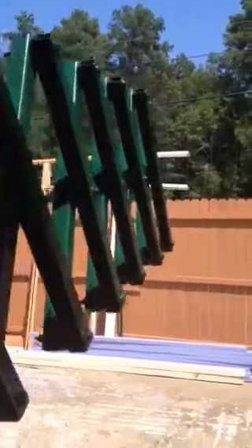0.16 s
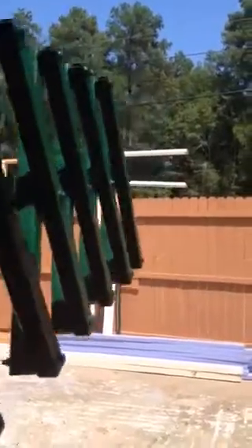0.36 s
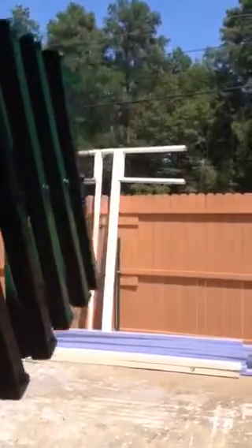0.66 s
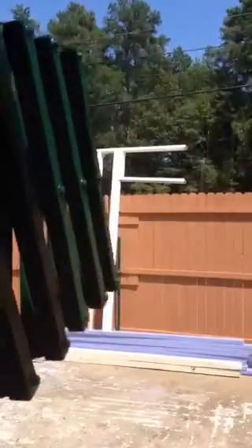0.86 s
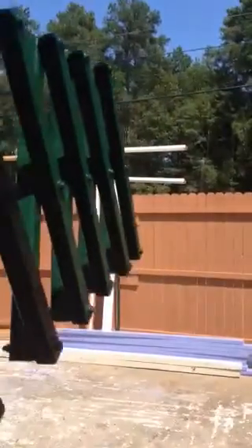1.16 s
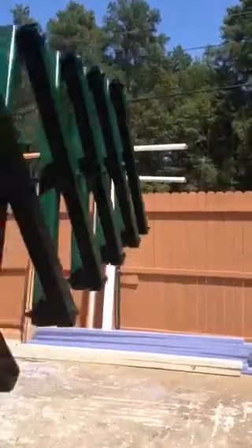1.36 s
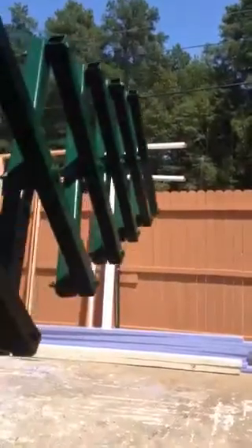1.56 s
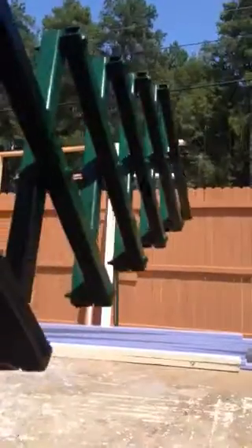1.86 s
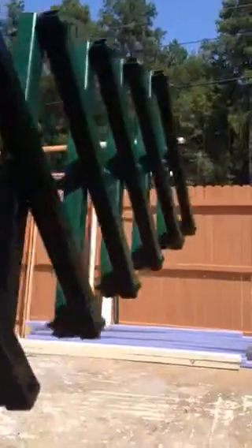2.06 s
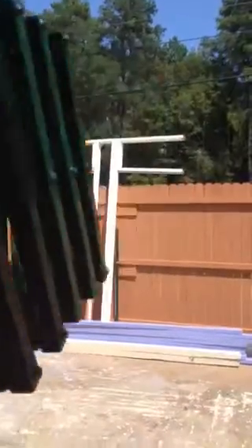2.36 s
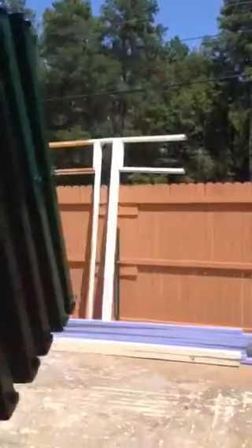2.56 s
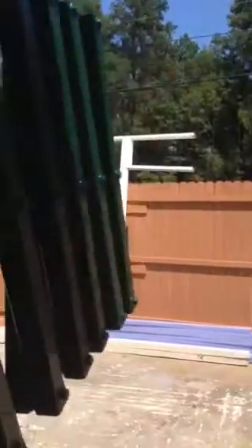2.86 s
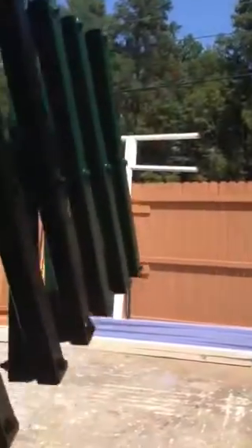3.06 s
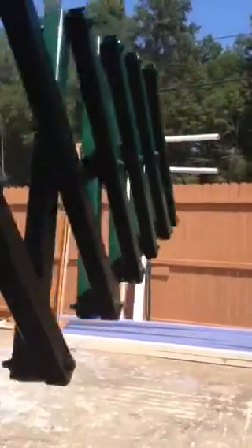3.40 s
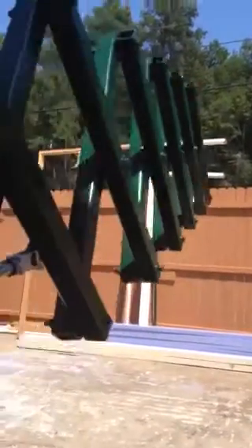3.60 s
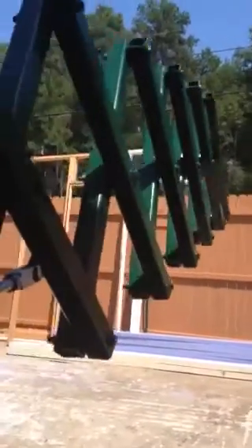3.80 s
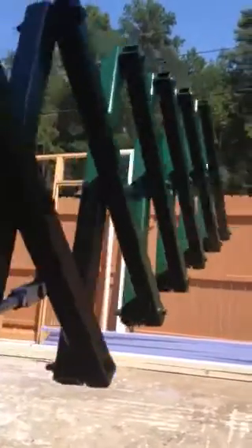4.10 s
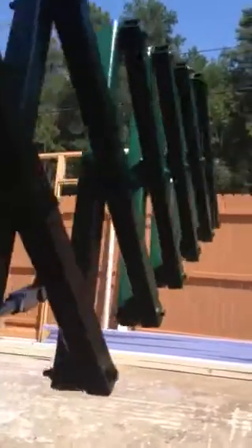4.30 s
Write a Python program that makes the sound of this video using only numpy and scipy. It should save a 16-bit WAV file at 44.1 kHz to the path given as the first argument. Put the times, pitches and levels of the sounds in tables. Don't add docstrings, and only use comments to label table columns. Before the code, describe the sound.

Three bursts of compressed air hiss and bleed away outdoors while a steel tube arm clinks, snaps and finally clatters hard.

```python
import sys
import numpy as np
from scipy import signal
from scipy.fft import rfft, irfft, next_fast_len
from scipy.io import wavfile
from scipy.ndimage import uniform_filter1d

SR = 44100
rng = np.random.default_rng(int(sys.argv[2]) if len(sys.argv) > 2 else 0)


def digitize_waveform(pressure):
    field = np.atleast_2d(pressure).T
    bounded = np.clip(field, -1, 1)
    quanta = np.round(bounded * 32767).astype(np.int16)
    wavfile.write(sys.argv[1], SR, quanta)


def voltage_ratio(level):
    return 10 ** (np.asarray(level, float) / 20)


N = 195754
TIME = np.arange(N) / SR

# pitch in Hz, level in dB, t60 in seconds.
TUBE_MODES = [(565, -6, .2), (667, -1, .25), (752, -4, .2), (836, -3, .2), (892, -4, .2), (981, -5, .2),
              (1097, -6, .2), (1318, -3, .2), (1380, -3, .2), (1497, 0, .2), (1695, -4, .2), (1935, -4, .2),
              (2100, -5, .2), (2257, -4, .2), (2312, -1, .25), (2650, -4, .2), (2736, -4, .2),
              (2929, -2, .25), (3356, -4, .17), (3547, -3, .2), (3760, -6, .13), (4025, -5, .14),
              (4510, -6, .11), (4750, -6, .1), (5050, -7, .1), (5600, -10, .09), (6400, -11, .08),
              (7312, -12, .1), (8200, -14, .07), (9700, -15, .06)]


def level(x, db):
    return x * voltage_ratio(db) / np.sqrt(np.mean(x ** 2))


def band(x, hz, width):
    return signal.lfilter(*signal.iirpeak(hz, hz / width, fs=SR), x)


def walk(rate):
    hold = int(SR / rate)
    steps = np.repeat(rng.standard_normal(N // hold + 1), hold)
    return 1.1 * uniform_filter1d(uniform_filter1d(steps, hold), hold)[:N]


def flicker_noise(table, flicker_db, rate):
    size = 2 * next_fast_len(N // 2 + 1)
    hz = np.maximum(np.fft.rfftfreq(size, 1 / SR), 1)
    f, db = np.transpose(table)
    spectrum = rfft(rng.standard_normal(size)) * voltage_ratio(np.interp(np.log(hz), np.log(f), db))
    place = 2 * np.log2(hz)
    bands = []
    for k in range(8, 30):
        piece = irfft(spectrum * np.clip(1 - abs(place - k), 0, 1))[:N]
        bands.append(voltage_ratio(flicker_db * walk(rate)) * piece)
    return bands


def add(out, s, piece):
    i = int(s * SR)
    out[i:i + len(piece)] += piece[:N - i]


def jet():
    # valve opens in seconds, shuts in seconds, jet level in dB,
    # first rush in dB, low turbulence over the jet in dB.
    bursts = [
        (-0.3, 0.526, -31, 9, 1),
        (1.466, 2.3, -33.5, 4, 5),
        (3.926, 4.8, -32, 4, 4.5),
    ]
    # frequency in Hz, density in dB per Hz.
    jet_spectrum = [(710, -37), (1200, -22), (1970, -17), (2240, -21), (2740, -15.5), (3360, -14.5),
                    (5630, -8), (6200, -7), (6750, -4), (8020, -2), (9620, -4.5), (13700, 1), (15600, -4)]
    # pitch in Hz, width in Hz, level in dB.
    port_modes = [(6157, 320, 5), (6300, 53, 10.5), (7800, 83, 2), (12130, 430, 3.5), (2660, 56, -5),
                  (4350, 270, -14)]
    open_s, surge_s, climb_db_per_s2 = 0.014, 0.14, 4
    shut_db, shut_s, bleed_db_per_s, empty_db_per_s2 = -6.5, 0.022, 14, 218
    whistle_db, whistle_db_per_s, whistle_shut_db, bleed_low_db = 6, 1.5, -12, 0.5

    bands = flicker_noise(jet_spectrum, 0.99, 24.2)
    low, high = sum(bands[:17]), sum(bands[17:])
    scale = 1 / np.std(high)
    edge = rng.standard_normal(N)
    whistle = 0
    for f, width, db in port_modes:
        cavity = band(band(edge, f, width * 1.2), f, width * 1.2)
        whistle = whistle + voltage_ratio(db + 1.4 * walk(28.37)) * cavity
    whistle = level(whistle, -16)

    out = 0
    for opens, shuts, db, surge_db, low_db in bursts:
        blowing = np.clip(TIME, opens, shuts) - opens
        after = np.maximum(TIME - shuts, 0)
        shut = 1 - np.exp(-after / shut_s)
        flow_db = db + surge_db * np.exp(-blowing / surge_s) + climb_db_per_s2 * blowing ** 2
        flow_db = flow_db + shut_db * shut - bleed_db_per_s * after - empty_db_per_s2 * after ** 2
        hiss = scale * (high + low * voltage_ratio(low_db + bleed_low_db * shut))
        hiss = hiss + whistle * voltage_ratio(whistle_db + whistle_db_per_s * blowing + whistle_shut_db * shut)
        out = out + hiss * voltage_ratio(flow_db + 2.0) * np.sqrt(np.minimum(blowing / open_s, 1))
    return out


def thumps():
    # start in seconds, peak level in dB, body pitch in Hz, t60 in seconds.
    spool_hits = [
        (0.518, -19.5, 330, 0.023),
        (1.468, -30, 497, 0.034),
        (1.473, -30.5, 323, 0.031),
        (1.542, -20.5, 333, 0.039),
        (1.563, -15.5, 296, 0.0083),
        (1.57, -30, 420, 0.061),
        (1.676, -33, 265, 0.039),
        (2.298, -21, 334, 0.027),
    ]
    out, t = np.zeros(N), TIME[:4000]
    for s, db, hz, t60 in spool_hits:
        slap_db = -31 + 0.43 * (db + 25) - db
        body = np.sin(2 * np.pi * hz * t) + .4 * np.sin(2 * np.pi * 1.6 * hz * t)
        body = body * np.exp(-np.log(1000) * t / max(t60, .004))
        slap = band(rng.standard_normal(len(t)) * np.exp(-t / 0.0097), 1080, 1400)
        hit = voltage_ratio(slap_db) * slap / abs(slap).max() + body / abs(body).max()
        add(out, s + 0.0024, voltage_ratio(db + 0.5) * hit)
    return out


def clinks():
    # start in seconds, peak level in dB, centre in Hz, spread in octaves.
    dull_hits = [
        (0.648, -31.5, 1710, .4),
        (1.968, -29.5, 1430, 0.62),
        (2.414, -38, 790, 0.44),
        (2.469, -27, 750, 0.34),
        (3.699, -29, 1500, .29),
        (3.834, -25, 834, 0.43),
        (4.125, -20, 710, 0.57),
    ]
    mid_hits = [
        (0.6986, -43, 1620, 0.17),
        (2.4359, -39, 2150, .17),
        (2.729, -31.5, 2770, .25),
        (2.819, -40.5, 2190, .41),
        (2.977, -39, 1790, 0.17),
        (2.9841, -42, 2190, 0.74),
        (3.246, -41, 2140, .3),
        (3.7681, -24, 1980, .46),
        (4.0948, -27, 1580, 0.12),
        (4.283, -30, 2940, .31),
    ]
    bright_hits = [(0.6501, -23.5, 4000, 0.24), (1.31, -40.5, 5040, 0.66), (1.332, -40.5, 3850, .38),
                   (1.361, -41.5, 4800, .31), (1.464, -19.5, 6530, 0.24), (2.4104, -34, 4240, 0.25),
                   (2.4409, -19.5, 4700, 0.23), (2.456, -36, 4810, .18), (2.4955, -29.5, 4760, 0.28),
                   (2.5342, -28, 4720, 0.21), (2.669, -39, 4120, 0.49), (3.205, -37, 3180, 0.34),
                   (3.215, -35.5, 4640, 0.14), (3.28, -43, 4040, .29), (3.291, -42.5, 4060, .35),
                   (3.3278, -43, 3980, .32), (3.365, -46, 3960, .35), (3.6619, -15.5, 3590, 0.2),
                   (3.917, -26, 3240, 0.48)]
    heavy_hits = [
        (3.6621, -9.5, 1660, 0.46),
        (3.7765, -23, 1990, 0.87),
        (3.925, -13, 1550, 0.44),
        (3.949, -15, 3720, 0.53),
        (4.0656, -27.5, 1580, 0.26),
        (4.138, -15.5, 2670, 0.98),
        (4.179, -13, 1420, 0.87),
        (4.194, -12.5, 2490, 0.31),
        (4.2024, -21, 1450, 0.6),
    ]
    # ring t60 in seconds at 1 kHz, contact in seconds.
    contacts = [(0.17, 0.0087), (.11, 0.005), (.11, 0.0048), (0.11, 0.0046)]
    out, t = np.zeros(N), TIME[:10000]
    f, mode_db, mode_t60 = np.transpose(TUBE_MODES)[:, :, None]
    for table, (ring_s, contact) in zip((dull_hits, mid_hits, bright_hits, heavy_hits), contacts):
        for s, db, hz, spread in table:
            t60 = ring_s * (1000 / hz) ** 0.56
            chance = rng.standard_normal((3, len(f), 1))
            spread = max(spread, .04)
            fall = np.log(1000) * t / max(t60, .01)
            gain = voltage_ratio(mode_db + 2 * chance[0]) * np.exp(-.5 * (np.log2(f / hz) / spread) ** 2)
            tones = np.sin(2 * np.pi * f * (1 + 0.014 * chance[1]) * t + 9 * chance[2])
            ring = np.sum(gain * np.exp(-fall * 0.1 / mode_t60) * tones, axis=0)
            ring = ring + .5 * np.exp(-fall) * np.sin(2 * np.pi * hz * t)
            push = rng.standard_normal(len(t)) * np.exp(-t / max(contact, .0002))
            hit = signal.fftconvolve(ring, push[:3000])[:len(t)]
            width = hz * min(1.5, 1.82 * spread)
            crack = band(band(push, hz, width), hz, width)
            hit = hit / abs(hit).max() + 10.6 * spread * crack / abs(crack).max()
            add(out, s, voltage_ratio(db + 1.5) * hit / abs(hit).max())
    return out


def scuffs():
    # start in seconds, peak level in dB, centre in Hz, fall in seconds.
    slow_slips = [
        (0.654, -19, 4360, 0.013),
        (1.335, -40, 6000, .02),
        (3.127, -34, 5500, 0.035),
        (3.153, -38, 5970, 0.014),
        (3.69, -14, 300, 0.031),
        (3.709, -18, 7000, 0.042),
        (3.778, -17, 4000, 0.026),
        (4.179, -23, 5000, 0.0054),
    ]
    snap_slips = [
        (2.457, -19.5, 9000, 0.0091),
        (2.733, -30.5, 8000, 0.03),
        (3.347, -31, 7500, 0.0042),
        (3.662, -1.5, 2850, 0.0089),
        (3.927, -7.5, 4500, 0.01),
        (4.066, -9, 5600, 0.0076),
        (4.139, -10, 5960, 0.012),
    ]
    out = np.zeros(N)
    for table, rise_share, width in ((slow_slips, .55, 0.89), (snap_slips, .07, 1.28)):
        for s, db, hz, fall in table:
            rise = rise_share * fall
            t = TIME[:9000] - 3 * rise
            swell = np.where(t < 0, np.exp(-2 * (t / rise) ** 2), np.exp(-t / fall))
            puff = rng.standard_normal(len(t)) * swell
            add(out, s - 3 * rise, voltage_ratio(db - 8.0) * band(puff, hz, min(width * hz, SR / 4)))
    return out


def creaks():
    # start in seconds, length in seconds, pitch in Hz, level in dB.
    stick_slips = [(0.647, 0.011, 4030, -33.5), (0.649, 0.01, 4980, -37), (1.327, .012, 3960, -48),
                   (3.21, .015, 1564, -50.5), (3.66, 0.013, 1520, -27), (1.661, 0.05, 960, -43.5),
                   (1.963, 0.029, 2660, -37.5), (2.414, 0.02, 4270, -41), (2.424, .02, 4930, -35.5),
                   (2.734, 0.029, 3130, -47), (2.882, 0.027, 2990, -56), (2.913, 0.032, 2540, -58),
                   (1.986, 0.025, 1360, -47), (2.98, .02, 2150, -53), (3.756, 0.06, 1970, -38.5),
                   (3.781, 0.069, 4200, -44), (3.825, 0.046, 907, -43.5), (4.282, .03, 2920, -40)]
    out, t = np.zeros(N), TIME[:6000]
    for s, length, hz, db in stick_slips:
        waver = uniform_filter1d(rng.standard_normal((2, len(t))), 110) * np.sqrt(110)
        grip = voltage_ratio(4 * waver[0])
        pitch = hz * (1 + .025 * waver[1])
        swell = np.clip(t / 0.0029, 0, 1) * np.exp(-np.maximum(t - length, 0) / 0.0093)
        add(out, s, voltage_ratio(db) * grip * swell * np.sin(2 * np.pi * np.cumsum(pitch) / SR))
    return out


def shaking():
    # time in seconds, clatter level in dB, dying away in dB per second,
    # bright scrape over clatter in dB.
    jolts = [(0.53, -40, 71, -9), (0.654, -38.5, 304, 6.5), (0.69, -49.5, 111, 11), (2.31, -40.5, 40, -10),
             (2.412, -33.5, 43, 0), (2.473, -28.5, 169, -7), (3.67, -26, 107, -3), (3.763, -35, 84, 6),
             (3.89, -42.5, 23, -6), (3.932, -25.5, 227, 3), (4.01, -43.5, 11, 7), (4.071, -25.5, 700, -9),
             (4.126, -20.5, 76, 1), (4.143, -19, 95, 4.5), (4.177, -19, 60, -3), (4.2, -21.5, 150, 0),
             (4.31, -37, 28, -16), (4.38, -40.5, 21, -1)]
    build_db_per_s, settle_db_per_s2 = 2500, 492
    s, db, fall, bright_db = np.transpose(jolts)[:, :, None]
    before, after = np.maximum(s - TIME, 0), np.maximum(TIME - s, 0)
    power = voltage_ratio(db - build_db_per_s * before - fall * after - settle_db_per_s2 * after ** 2) ** 2
    dull = np.sqrt(power.sum(axis=0))
    bright = np.sqrt((power * voltage_ratio(bright_db) ** 2).sum(axis=0))
    return dull, bright


def rattle():
    strength = voltage_ratio(np.minimum(rng.exponential(size=N), 3.0))
    knocks = (rng.random(N) < 1200 / SR) * strength
    rub = signal.lfilter([1], [1, -np.exp(-1 / (0.0022 * SR))], knocks)
    grit = level(rub * rng.standard_normal(N), 0)
    dull, bright = grit * np.array(shaking())
    frame = 0
    for f, db, t60 in TUBE_MODES:
        drive = dull if f < 2800 else bright
        frame = frame + voltage_ratio(db) * np.sqrt(t60) * band(drive, f, 4 / t60)
    scrape = voltage_ratio(0.5) * band(band(dull, 1160, 2500), 1160, 2500)
    scrape = scrape + voltage_ratio(-7.5) * band(bright, 4300, 8800) + voltage_ratio(3.5) * band(dull, 310, 630)
    return voltage_ratio(18.5) * frame + scrape


def fence_echoes(near):
    # delay in seconds, level in dB.
    reflections = [(.021, -22), (.037, -24), (.058, -26), (.083, -28)]
    out = np.zeros(N)
    for s, db in reflections:
        add(out, s, voltage_ratio(db) * band(near, 1670, 5600))
    return out


def compressor():
    # pitch in Hz, width in Hz, level in dB.
    casing = [(159.3, 23, -2.5), (243, 13, -4.5), (312.4, 6, -5.5), (420, 32, -0.5), (493, 37, -15),
              (587, 6.8, -5.5), (820, 160, -7), (978, 8.7, -3)]
    stroke_hz = 28.9
    turns = np.cumsum(stroke_hz * (1 + .003 * walk(3.3)) / SR)
    strokes = np.diff(np.floor(turns), prepend=0) * voltage_ratio(2.0 * rng.standard_normal(N))
    rush = np.exp(-(turns % 1) / 2.0) * rng.standard_normal(N)
    drive = level(strokes, 0) + level(rush, -0.89)
    drone = 0
    for k, (f, width, db) in enumerate(casing):
        drone = drone + (-1) ** k * voltage_ratio(db) * level(band(drive, f, width), 0)
    return level(drone, -53.5)


def insect():
    # time in seconds, pitch in Hz, level in dB.
    glide = [
        (3.39, 8600, -85),
        (3.42, 8500, -57),
        (3.45, 8400, -58),
        (3.52, 8150, -61),
        (3.59, 7800, -58),
        (3.65, 7650, -67),
    ]
    s, hz, db = np.transpose(glide)
    buzz = np.interp(TIME, s, hz) + 150 * walk(600)
    swell = voltage_ratio(np.interp(TIME, s, db, right=-99) + 5 * walk(80))
    return np.sin(2 * np.pi * np.cumsum(buzz) / SR) * swell


def outdoor_air():
    # frequency in Hz, density in dB per Hz.
    air_spectrum = [(18, -76), (30, -36.5), (160, -4.5), (203, -8), (237, 5), (370, -14), (422, -2.5),
                    (520, -7), (1000, -10.5), (1520, -15.5), (1970, -15), (2190, -19), (2630, -17.5),
                    (8330, -19), (15600, -18)]
    return level(sum(flicker_noise(air_spectrum, 1.0, 8.36)), -47)


def scene():
    near = jet() + thumps() + clinks() + scuffs() + creaks() + rattle()
    near = signal.sosfilt(signal.butter(4, 155, "high", fs=SR, output="sos"), near)
    out = near + fence_echoes(near) + compressor() + insect() + outdoor_air()
    return np.array([out, out])


def band_limit(x):
    return signal.sosfilt(signal.butter(12, 16620, fs=SR, output="sos"), x)


def record(dry):
    hz, _, z = signal.stft(dry[0], SR, nperseg=1024)
    chance = rng.standard_normal((len(hz) // 4 + 1, z.shape[1]))
    chance = np.repeat(chance, 4, axis=0)[:len(hz)]
    patch_db = 1.87 * chance - 14 * (chance < -2.3)
    treble = np.clip(hz / 7000 - .3, 0, 1)[:, None]
    x = signal.istft(z * voltage_ratio(patch_db * treble), SR, nperseg=1024)[1][:N]
    x = signal.sosfilt(signal.ellip(14, .2, 75, 15270, fs=SR, output="sos"), x)
    return band_limit(np.array([x, x]))


dry = scene()
out = record(dry)
digitize_waveform(out)
```